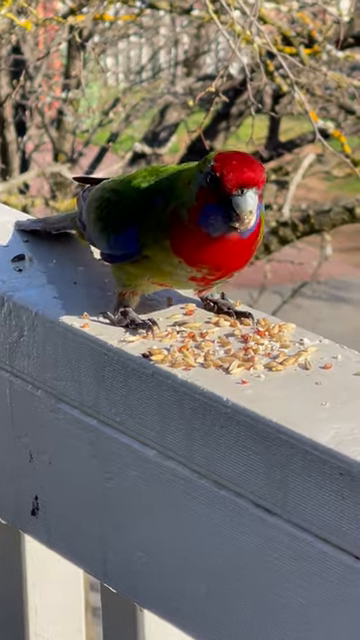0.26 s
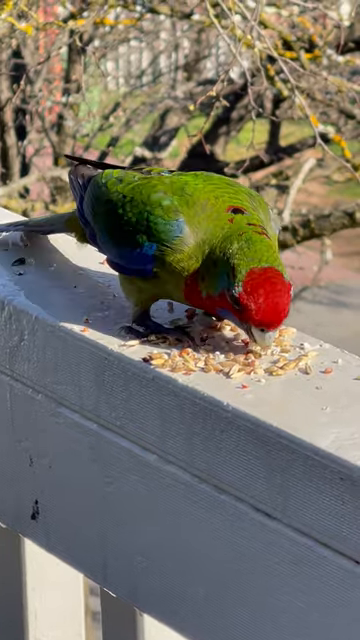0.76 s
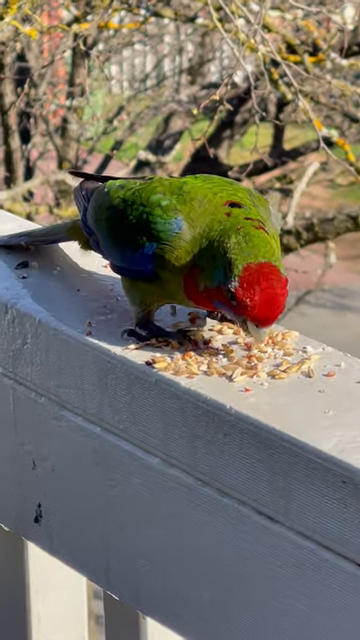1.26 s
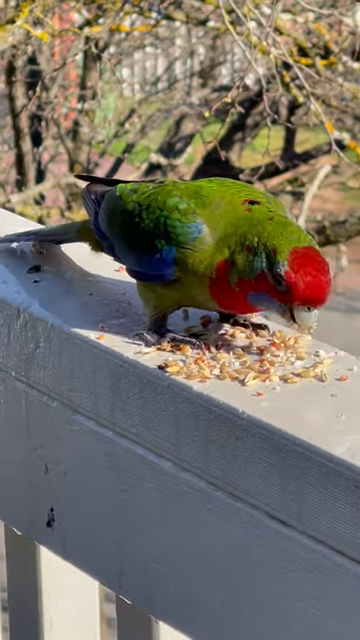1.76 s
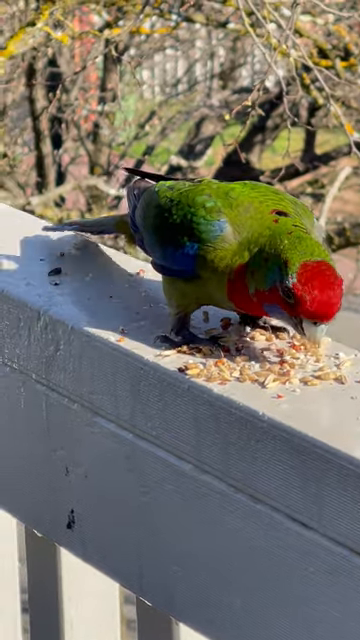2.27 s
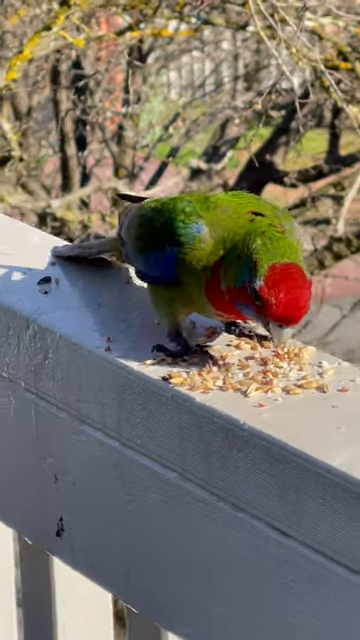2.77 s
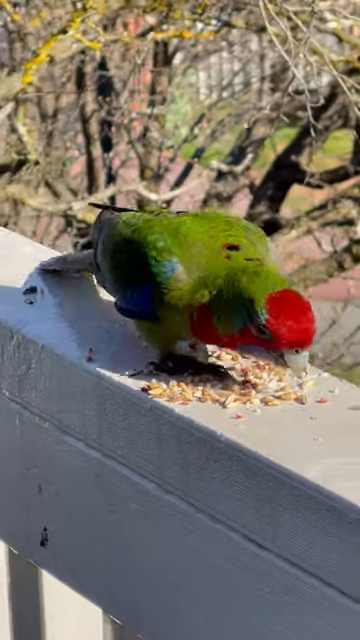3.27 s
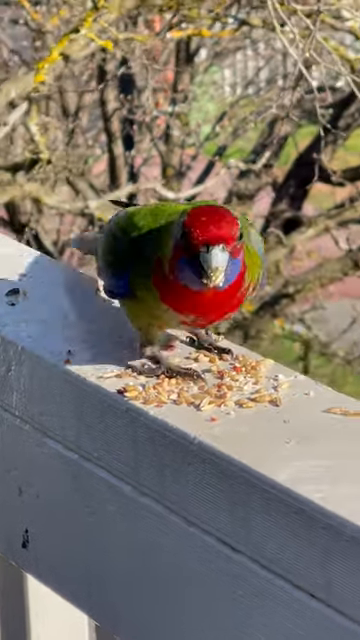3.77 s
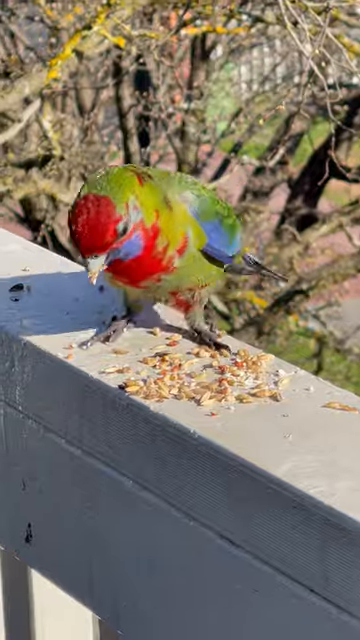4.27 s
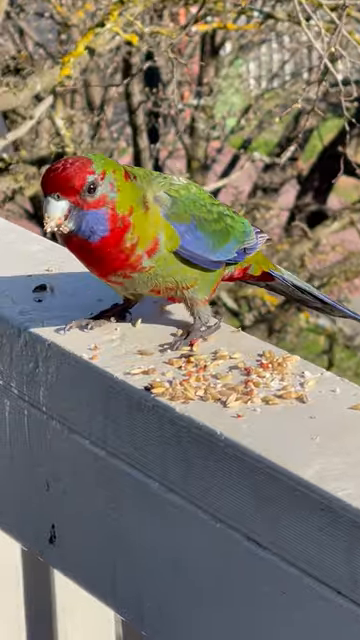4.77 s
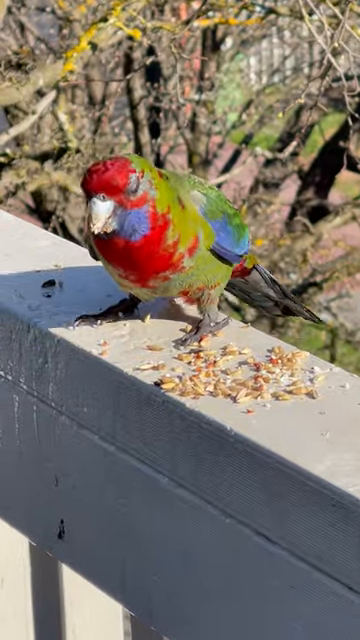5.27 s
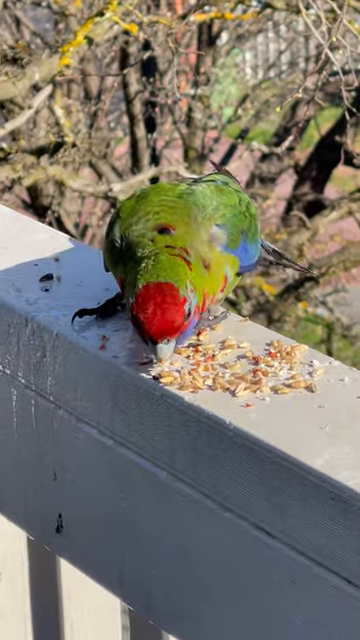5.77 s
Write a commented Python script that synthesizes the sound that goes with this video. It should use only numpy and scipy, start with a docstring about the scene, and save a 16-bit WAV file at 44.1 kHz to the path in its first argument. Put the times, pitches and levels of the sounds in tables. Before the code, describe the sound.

Outdoors on a porch, a parrot cracks seeds very near the microphone: two sharp snaps at once, the second very loud, then a pause with bird peeps over a low motor drone. Lighter knocks and husk crackles follow, claws squeak on the wooden rail, another loud crack comes near five seconds, then a short nasal squawk as a vehicle approaches.

```python
"""A husk crackles over a low far drone, outdoor air and a faint high buzz from a camera.
Then a parrot cracks seeds close by on a painted wooden porch rail: sharp snaps, pitched knocks, a short porch tail.
Garden birds call as gliding tones with a scattered tail; later claws stick, slip and squeak on the rail,
a nasal squawk is built from harmonics, and a vehicle draws nearer as tyre noise and gliding engine tones."""
import sys
import numpy as np
from scipy import signal
from scipy.fft import rfft, irfft
from scipy.io import wavfile
from scipy.ndimage import uniform_filter1d

SR = 44100
rng = np.random.default_rng(int(sys.argv[2]) if len(sys.argv) > 2 else 0)


def store_wav(level_fs):
    """Save 16-bit WAV to argv[1]."""
    pcm = np.round(np.clip(np.atleast_2d(level_fs), -1, 1) * 32767)
    wavfile.write(sys.argv[1], SR, pcm.T.astype(np.int16))


N = 266099
T = np.arange(N) / SR  # time/s
HZ = np.fft.rfftfreq(N, 1 / SR)  # f/Hz

# husks crumbling in the beak: [t/s, length/s, level/dB, brightness/(dB per octave)]
HUSK_CRUMBLES = [(0, 0.02, -63, 0), (0.056, 0.029, -57, -4), (0.431, 0.011, -68.5, 1),
                 (0.763, 0.03, -74.5, 0.5), (1.675, 0.014, -64, -1), (1.909, 0.027, -67, -3.5),
                 (2.24, 0.018, -69.5, -7.5), (2.799, 0.015, -58, -.5), (2.955, 0.044, -57, -6.5),
                 (3.669, 0.041, -67.5, 16), (3.709, 0.018, -62, 18), (5.237, 0.065, -74, -5),
                 (5.319, 0.024, -61.5, -2.5), (5.362, 0.094, -79, -2), (5.478, 0.018, -59, -7),
                 (5.606, 0.018, -65.5, -4), (5.66, 0.13, -77, -6), (5.798, 0.026, -67, 1),
                 (5.952, 0.021, -58.5, -3.5), (5.964, 0.072, -63.5, 2)]
# relative colour of crumbling husk: [f/Hz, level/dB]
HUSK_COLOUR = [(800, -24), (3000, -1.5), (4500, 1), (7000, 3.5), (9000, -0.5), (10900, 6), (11700, -18),
               (12600, -48), (15000, -75)]
# relative colour of the wooden rail under a claw: [f/Hz, level/dB]
RAIL_COLOUR = [(300, -20), (800, -11), (960, -3), (1100, -9), (1500, -13), (1780, -2), (2090, -1),
               (2240, -3), (2370, 2), (2560, -7), (2720, 0), (2900, -7), (3080, 1), (3300, -9), (3540, -4),
               (3900, -10), (4200, -7), (4800, -17), (8000, -27), (11000, -36), (13000, -60), (15000, -80)]

# swells of the far motor: [t/s, level/dB]
DRONE_LEVEL = [(0, -49), (.8, -48.5), (1.1, -46), (1.5, -51), (1.65, -56), (2.05, -59), (2.25, -54.5),
               (2.9, -53.5), (3.5, -67), (4.25, -69.5), (4.45, -51.5), (5.02, -47.5), (5.7, -58)]
# start pitch/Hz, its climb/(Hz per s), and the level/dB of the octave above
DRONE_HZ, DRONE_CLIMB_HZ_PER_S, DRONE_OCTAVE_DB = 82, .55, -65.5

# relative colour of the vehicle's tyre roar: [f/Hz, density/(dB per Hz)]
ROAD_COLOUR = [(25, -29.5), (55, 1), (120, 1), (250, 1.5), (500, -2), (900, -5), (1600, -12.5),
               (3000, -24.5), (5000, -34.5), (8000, -42), (11000, -51.5), (13000, -83), (15000, -92)]
# the vehicle's path, the loss over the ground between, and the roar at the closest point
CLOSEST_S, CLOSEST_M, SPEED_M_PER_S, LOSS_DB_PER_M, ROAR_DB = 5.95, 25, 15.94, 0.05, -50.5
# engine tones: [loudest t/s, f there/Hz, glide/(Hz per s), level/dB, rise/(dB per s), fall/(dB per s)]
ENGINE_TONES = [(3.8, 197.2, -7.5, -57, 9, 3.5), (4.501, 52.8, 4.5, -54, 27, 9.5),
                (5.68, 321, 26, -53, 10, 35)]
# relative colour of steady outdoor air: [f/Hz, density/(dB per Hz)]
AIR_COLOUR = [(15, -47.5), (28, -23.5), (45, -4), (75, 5.5), (120, -4.5), (190, -6), (260, -10),
              (360, -12.5), (700, -18), (1500, -25.5), (2600, -33), (4200, -51.5), (10800, -48.5),
              (13000, -70), (15000, -81.5)]

# shell cracks and beak taps: [t/s, snap energy/dB, snap brightness/(dB per octave),
# factor on the snap's frequencies, knock energy/dB, knock f/Hz]
SEED_CRACKS = [(0.1105, -14, -3, .98, -33, 2800), (.1613, 3, 0.5, 1, -20, 1204),
               (1.553, -60, -13, 1, -33, 1250), (1.888, -44, 2, 0.98, -52, 2590),
               (2.033, -54, -10, 1, -32.5, 1450), (2.276, -46, -6, 0.81, -56, 2960),
               (2.3727, -49.5, -15, 0.73, -43, 2010), (2.517, -27, -12.5, 1.05, -32, 2900),
               (2.6035, -42, 1, 0.93, -52, 3000), (2.801, -34, 0, 0.99, -55, 2400),
               (2.953, -29, -3, 0.92, -42, 1300), (3.541, -52, -6, 1, -30.5, 1550),
               (3.573, -33.5, 19, 0.99, -38, 2700), (4.108, -37, 24, 1, -50, 2400),
               (4.1244, -20, 23.5, .99, -34.5, 2400), (4.322, -39.5, -6, 1.03, -51.5, 2410),
               (4.402, -45, 8, 1.06, -52, 2410), (4.6417, -24, 4, 0.98, -28, 4100),
               (5.0719, -6, -6.5, 0.99, -24, 3400), (5.322, -32, 3, 1, -41, 2410),
               (5.336, -32.5, -10, .9, -41, 2000), (5.481, -40, -11, .9, -41, 3180),
               (5.7998, -32, 17, .98, -47, 2400), (5.901, -41, -4, 0.99, -58, 2400),
               (5.956, -29, -9, 0.99, -42, 1300)]
# relative colour of a snapping shell: [f/Hz, level/dB]
SNAP_COLOUR = [(500, -57.5), (2500, -29.5), (4500, -21), (5700, -16), (7200, -7), (9100, -1), (10800, -2.5),
               (11600, -19), (12600, -38), (14300, -43), (16000, -60)]
# broad resonance of beak and seed: [multiple of the knock's pitch, level/dB]
KNOCK_COLOUR = [(.15, -17), (.55, -12.5), (1, 0), (1.5, -9), (2.6, -17), (4, -35), (8, -52), (14, -68)]
# single echoes from nearby hard surfaces: [delay/s, level/dB]
HARD_ECHOES = [(.0026, -22), (.0053, -16.5), (.0071, -21.5), (0.0096, -25.5), (0.013, -25.5)]
# decay of the porch tail by 60 dB: [f/Hz, t60/s]
PORCH_DECAY = [(200, 0.27), (1500, 0.12), (4000, .24), (9000, 0.15), (11500, 0.19), (14000, 0.096)]

# a busy moment of faint chatter; its level is that of the lowest calls
CHATTER_START_S, CHATTER_END_S, CHATTER_LOW_HZ, CHATTER_HIGH_HZ, CHATTER_DB = .25, 1.25, 2100, 3400, -77.5
# a very distant bird repeats one rising note: [t/s, level/dB]
RISING_NOTES = [(5.222, -70.5), (5.348, -73), (5.6, -69), (5.72, -68)]
RISE_S, RISE_FROM_HZ, RISE_TO_HZ = .045, 2900, 4900
# single slurred chirps in the trees: [t/s, length/s, start f/Hz, end f/Hz, mid-note bow/Hz, level/dB]
SLURRED_CHIRPS = [(0.321, 0.031, 2190, 2665, 1, -68), (0.36, 0.01695, 2050, 2540, 3, -65.5),
                  (0.483, .052, 3330, 3100, 450, -83), (0.526, 0.062, 2940, 3070, -120, -75.5),
                  (0.585, 0.022, 3110, 2640, 72, -74), (0.807, 0.043, 2300, 2238, 0, -72),
                  (0.885, 0.05, 4590, 3840, 2, -86), (2.272, 0.06, 4130, 3490, -62, -70),
                  (2.308, 0.02, 2190, 2700, 4, -63.5), (2.389, .035, 2810, 2300, 2, -73.5),
                  (3.271, 0.075, 3390, 3340, -1, -78.5), (4.44, .035, 3350, 3140, 0, -73.5)]
# a far bird's runs of falling notes: [t/s, length/s, start f/Hz, level/dB]
FALLING_PEEPS = [(0.415, 0.04, 2005, -56.5), (0.537, 0.042, 1960, -59.5), (0.671, 0.043, 1953, -59),
                 (0.807, 0.044, 1940, -59.5), (.939, 0.049, 1900, -62), (1.072, 0.059, 1910, -64.5),
                 (1.202, 0.051, 2070, -64.5), (1.34, .061, 1990, -66), (2.376, 0.047, 1950, -63),
                 (2.498, 0.044, 1940, -63.5), (2.634, .053, 1920, -65.5)]
PEEP_FALL = .35  # share of the pitch lost over one note
# whistles with a falling end: [t/s, f/Hz, slope/(Hz per s), level/dB]
HOOKED_WHISTLES = [(0.913, 3015, -300, -66.5), (1.72, 3076, -1400, -66), (2.2, 2855, 1799, -64.5),
                   (2.654, 2920, 98, -66)]
# pitch bend shared by these whistles: [t into the note/s, factor on the pitch]
WHISTLE_BEND = [(0, 0.98), (.012, 1), (.064, 1), (.076, .95), (.092, .76)]
# the trill's start, length, centre pitch, and opening level at mid-sweep
TRILL_START_S, TRILL_LENGTH_S, TRILL_HZ, TRILL_DB = 2.437, .19, 3136, -62.5
# a thin high call that slides down and then holds: [t/s, f/Hz, level/dB]
THIN_CALL_PATH = [(2.665, 6300, -95), (2.688, 5880, -79), (2.76, 5790, -84.5), (2.88, 5810, -86),
                  (2.92, 5750, -100)]

# claws dragged over the rail: [t/s, length/s, wood level/dB, grit level/dB, squeak f/Hz, squeak level/dB]
CLAW_SCRAPES = [(2.971, 0.015, -59, -68, 2080, -58.5), (3.117, .016, -75, -74, 2130, -66),
                (3.129, 0.015, -61, -66, 2120, -53.5), (3.399, .022, -68, -77, 2120, -56.5),
                (3.42, 0.031, -57, -67, 2130, -49.5), (3.453, 0.027, -52, -64.5, 2050, -53),
                (3.572, 0.0212, -55.5, -72, 1980, -57.5), (3.603, 0.025, -74, -79, 1880, -59.5),
                (3.698, 0.04, -64, -75, 2070, -57.5)]
# a nasal squawk that breaks upward twice: [t/s, pitch f/Hz, level/dB]
SQUAWK_PATH = [(5.395, 739, -72), (5.434, 808, -64), (5.446, 771, -58.5), (5.453, 865, -53.5),
               (5.46, 880, -50.5), (5.47, 841, -54), (5.474, 774, -55), (5.5, 754, -54), (5.512, 735, -54),
               (5.527, 767, -59), (5.538, 750, -52), (5.549, 860, -50.5), (5.566, 841, -51),
               (5.585, 770, -70)]

# how alike the noise is at the two microphone ports: [f/Hz, likeness 0..1]
PORT_LIKENESS = [(150, 1), (250, .9), (600, .79), (1200, .58), (2000, 1)]
# phase by which the left port leads: [f/Hz, lead/rad]
PORT_LEAD = [(50, 0), (430, 0), (860, .55), (1460, -.3), (2500, .7), (4130, .75), (4650, 1.9), (5200, 4.9),
             (5650, 6.1), (8000, 8.3), (9150, 9.42), (10900, 11.1), (12000, 12.5)]
# left minus right: [f/Hz, level/dB]
PORT_BALANCE = [(40, -.3), (170, -1.4), (350, -2.4), (700, -3.3), (1400, -.4), (3000, .1), (11000, .7)]
EDGE_HZ = 16000  # upper band limit


def amp(db):
    """Turns decibels into gain."""
    return 10 ** (np.asarray(db) / 20)


def evened(x):
    """Scales a signal to rms 1."""
    return x / np.sqrt(np.mean(x ** 2) + 1e-20)


def read(points, hz):
    """Reads a spectrum on a log-frequency axis."""
    f, value = np.transpose(points)
    return np.interp(np.log(hz + 1e-9), np.log(f), value)


def follow(rows, t):
    """Reads every column of a curve at the times t."""
    s, *columns = np.transpose(rows)
    return [np.interp(t, s, c) for c in columns]


def add(mix, s, sound):
    """Mixes a sound in at time s."""
    part = mix[max(round(s * SR), 0):][:len(sound)]
    part += sound[:len(part)]


def drift(rate):
    """Smooth random motion of rms 1, changing about rate times a second."""
    noise = rfft(rng.standard_normal(N))
    return evened(irfft(noise * np.exp(-(HZ / rate) ** 2), N))


def colour(x, points, tilt_db=0, scale=1, size=1024):
    """Minimum-phase filter of energy 1; scale shifts its spectrum, tilt_db per octave acts from 2.5 to 11 kHz."""
    hz = abs(np.fft.fftfreq(size, 1 / SR))
    octaves = np.log2(np.clip(hz, 2500, 11000) / 11000)
    log_gain = np.log(amp(read(points, hz / scale) + tilt_db * octaves))
    # the Hilbert transform supplies the phase that makes the ring start at once
    ring = np.fft.ifft(np.exp(np.conj(signal.hilbert(log_gain)))).real
    return signal.fftconvolve(x, ring / np.linalg.norm(ring))


def note(hz, db, soft=0.17):
    """A pure whistle along a pitch curve; soft is the share of its length spent fading at the ends."""
    tone = np.sin(2 * np.pi * np.cumsum(hz) / SR)
    return amp(db) * np.sqrt(2) * tone * signal.windows.tukey(len(hz), soft)


def reflected(x):
    """Rail, post and wall send back single echoes within about 13 milliseconds."""
    out = x.copy()
    for delay, db in HARD_ECHOES:
        add(out, delay, amp(db) * x)
    return out


def porch(x, early_db, tail_db, first_s=0.0044, early_t60=0.026):
    """Close surfaces scatter the sound at once; walls and roof add a short tail whose decay varies with pitch."""
    t = T[:SR // 2]
    signs = rng.choice([-1., 1.], (2, len(t)))
    taps = signs * (rng.random((2, len(t))) < .2)
    early = taps[0] * (t > .001) * amp(-60 * t / early_t60)
    hz, frame_s, z = signal.stft(taps[1] * (t > first_s), SR, nperseg=256)
    decay = amp(-60 * frame_s / read(PORCH_DECAY, hz)[:, None])
    tail = signal.istft(z * decay, SR, nperseg=256)[1][:len(t)]
    echoes = amp(early_db) * early / np.linalg.norm(early)
    echoes += amp(tail_db) * tail / np.linalg.norm(tail)
    return x + signal.fftconvolve(x, echoes)[:N]


def garden(x, wet_db=-8, t60=0.45, taps_per_s=500):
    """Trees and fences scatter far calls into a thin, longer tail."""
    t = T[:SR // 2]
    taps = rng.standard_normal(len(t)) * (rng.random(len(t)) < taps_per_s / SR)
    tail = taps * (t > .008) * amp(-60 * t / t60)
    return x + amp(wet_db) * signal.fftconvolve(x, tail / np.linalg.norm(tail))[:N]


def slips(per_s, spread_db, clump_db):
    """Tiny stick-slip steps of uneven size that come in clumps."""
    spread = spread_db * np.minimum(rng.exponential(1, N), 4)
    size = amp(spread + clump_db * drift(140))
    return rng.choice([-1, 1], N) * (rng.random(N) < per_s / SR) * size


def stroke(steps, s, length, swell_db_per_s):
    """One stroke's run of slips, swelling or fading, with soft ends."""
    run = steps[max(int(s * SR), 0):][:int(length * SR)] + 1e-9
    swell = amp(swell_db_per_s * T[:len(run)])
    return evened(run * swell) * signal.windows.tukey(len(run), .3)


def husking(rail_db=-11):
    """Husks crackle in the beak as bursts of tiny slips and faintly ring the rail."""
    out = np.zeros(N)
    steps = slips(per_s=2500, spread_db=-0.5, clump_db=4.5)
    for s, length, db, bright_db in HUSK_CRUMBLES:
        run = amp(db) * stroke(steps, s, length, swell_db_per_s=-18.5)
        add(out, s, colour(run, HUSK_COLOUR, bright_db) + amp(rail_db) * colour(run, RAIL_COLOUR))
    return out


def engine_tone(hz, db, waver_hz, flutter_db):
    """A far engine order, wavering on the way through the air."""
    phase = 2 * np.pi * np.cumsum(hz + waver_hz * drift(8)) / SR
    return np.sqrt(2) * amp(db + flutter_db * drift(10)) * np.sin(phase)


def motor():
    """A low drone creeps up in speed and swells and sinks; its octave only flutters in level."""
    hz = DRONE_HZ + DRONE_CLIMB_HZ_PER_S * T
    db, = follow(DRONE_LEVEL, T)
    drone = engine_tone(hz, db, waver_hz=0.65, flutter_db=-0.06)
    return drone + engine_tone(2 * hz, DRONE_OCTAVE_DB, waver_hz=0.72, flutter_db=3.5)


def wash(spectrum, patchy_db):
    """Outdoor noise in drifting patches, partly shared between the two ports."""
    hz = np.fft.rfftfreq(2048, 1 / SR)
    a, b, c, d, patches = rng.standard_normal((N // 512 + 5, len(hz), 5)).T
    patches = uniform_filter1d(patches, size=14, axis=0)
    patches = evened(uniform_filter1d(patches, size=8, axis=1))
    same = read(PORT_LIKENESS, hz)[:, None]
    left = a + 1j * b
    right = same * left + np.sqrt(1 - same ** 2) * (c + 1j * d)
    z = np.array([left, right]) * amp(read(spectrum, hz)[:, None] + patchy_db * patches)
    return evened(signal.istft(z, nperseg=2048, noverlap=1536)[1][:, :N])


def vehicle():
    """Tyre roar grows as the distance shrinks; engine tones swell and fade as they glide."""
    metres = np.hypot(CLOSEST_M, SPEED_M_PER_S * (T - CLOSEST_S))
    nearness = CLOSEST_M / metres
    ground_db = -LOSS_DB_PER_M * (metres - CLOSEST_M)
    out = amp(ROAR_DB + ground_db) * nearness * wash(ROAD_COLOUR, patchy_db=1.22)
    for s, hz, glide, db, rise, fall in ENGINE_TONES:
        t = T - s
        swell_db = np.minimum(rise * t, -fall * t)
        out += engine_tone(hz + glide * t, db + swell_db, waver_hz=1.3, flutter_db=2.5)
    return out


def outdoor_air():
    """A steady bed of low, softly patchy air noise."""
    return amp(-52.5) * wash(AIR_COLOUR, patchy_db=1.37)


def camera_buzz(hz=10320, level_db=-71, hiss_db=-82, waver=1.04):
    """The camera's electronics give a tiny high pip with every frame, over a narrow hiss."""
    frame_rate, pip_s = 59.9, .0018
    since = (T * frame_rate % 1 - .5) / frame_rate
    pips = amp(level_db + 2 * drift(40)) * np.exp(-(since / pip_s) ** 2)
    phase = 2 * np.pi * hz * T
    hiss = drift(500) * np.sin(phase) + drift(460) * np.cos(phase)
    return pips * np.sin(phase + waver * drift(100)) + amp(hiss_db) * hiss


def cracks(split_s=0.00052, split_db=-11, rattle_db=-6, rattle_t60=0.03):
    """A shell snaps in one sharp step and splits on a moment later; each seed knocks at its own pitch."""
    out, t = np.zeros(N), T[:SR // 50]
    for s, snap_db, bright_db, shift, knock_db, knock_hz in SEED_CRACKS:
        snap = colour(amp([snap_db]), SNAP_COLOUR, bright_db, shift)
        add(out, s, snap)
        add(out, s + split_s * rng.uniform(.85, 1.3), amp(split_db) * snap)
        rattle = rng.standard_normal(len(t)) * amp(-60 * t / rattle_t60)
        # one click with a short rattle behind it excites the knock
        blow = (t == 0) + amp(rattle_db) * rattle / np.linalg.norm(rattle)
        add(out, s, amp(knock_db) * colour(blow, KNOCK_COLOUR, scale=knock_hz))
    return out


def far_birds(chatter_s=0.0253, glide=.25, dull_db_per_octave=12, blur_t60=.08, count=44):
    """Chatter and rising notes from so deep in the trees that only scattered sound arrives."""
    out = np.zeros(N)
    calls = [(s, RISE_S, RISE_FROM_HZ, RISE_TO_HZ, db) for s, db in RISING_NOTES]
    for when, height, slope in rng.random((count, 3)):
        s = CHATTER_START_S + when * (CHATTER_END_S - CHATTER_START_S)
        hz = CHATTER_LOW_HZ * (CHATTER_HIGH_HZ / CHATTER_LOW_HZ) ** height
        end_hz = hz * (1 + glide * (2 * slope - 1))
        db = CHATTER_DB - dull_db_per_octave * np.log2(hz / CHATTER_LOW_HZ)
        calls.append((s, chatter_s, hz, end_hz, db))
    for s, length, start_hz, end_hz, db in calls:
        paths = rng.standard_normal(4096) * amp(-60 * T[:4096] / blur_t60)
        call = note(np.linspace(start_hz, end_hz, int(length * SR)), db)
        add(out, s, signal.fftconvolve(call, paths / np.linalg.norm(paths)))
    return out


def twitters(wobble=0.0072, flutter_db=4.5):
    """Quick chirps in the trees glide and bow in pitch, unsteady in pitch and level."""
    out, unsteady = np.zeros(N), 1 + wobble * drift(200)
    for s, length, start_hz, end_hz, bow_hz, db in SLURRED_CHIRPS:
        t = T[T < length]
        bow = bow_hz * (1 - (2 * t / length - 1) ** 2)
        hz = np.interp(t, [0, length], [start_hz, end_hz]) + bow
        add(out, s, note(hz * np.interp(s + t, T, unsteady), db, soft=0.22))
    return out * amp(flutter_db * drift(130))


def peeps(echo_s=.037, echo_db=-4, flutter_db=1.5, wobble=.011, octave_db=-18):
    """Falling notes with a faint growing octave, each doubled by an echo off a wall."""
    out, unsteady = np.zeros(N), 1 + wobble * drift(270)
    for s, length, hz, db in FALLING_PEEPS:
        t = T[T < length]
        pitch = hz * (1 - PEEP_FALL) ** (t / length) * np.interp(s + t, T, unsteady)
        peep = note(pitch, db, soft=0.72) + note(2 * pitch, db + octave_db) * t / length
        add(out, s, peep)
        add(out, s + echo_s, amp(echo_db) * peep)
    return out * amp(flutter_db * drift(120))


def whistles(flutter_db=1.0, wobble=0.004):
    """Gently sloping whistles whose pitch drops in a hook at the end."""
    out, t = np.zeros(N), T[T < WHISTLE_BEND[-1][0]]
    bend, = follow(WHISTLE_BEND, t)
    unsteady = 1 + wobble * drift(150)
    for s, hz, slope, db in HOOKED_WHISTLES:
        pitch = (hz + slope * t) * bend * np.interp(s + t, T, unsteady)
        add(out, s, note(pitch, db, soft=0.1))
    return out * amp(flutter_db * drift(110))


def trill(sweeps_per_s=74, slowing_per_s=3.7, depth_hz=200, fade_db_per_s=18):
    """Short down-sweeps that slow and fade; the voice rests while the pitch jumps back."""
    out, t = np.zeros(N), T[T < TRILL_LENGTH_S]
    cycle = np.cumsum(sweeps_per_s * np.exp(-slowing_per_s * t)) / SR % 1
    pitch = TRILL_HZ + depth_hz * (1 - 2 * cycle)
    sweeps = note(pitch, TRILL_DB - fade_db_per_s * t, soft=0.18)
    add(out, TRILL_START_S, np.sin(np.pi * cycle) ** 2 * sweeps)
    return out


def thin_call(wobble=.011, flutter_db=3.5):
    """One faint, flickering high whistle follows a drawn pitch and level."""
    hz, db = follow(THIN_CALL_PATH, T)
    sounding = (T > THIN_CALL_PATH[0][0]) & (T < THIN_CALL_PATH[-1][0])
    pitch = hz * (1 + wobble * drift(210))
    return sounding * note(pitch, db + flutter_db * drift(60), soft=0)


def scrapes(squeak_width_hz=170):
    """A claw catches and slips: the wood rings, grit crackles, and each stroke squeaks at its own pitch."""
    out, t = np.zeros(N), T[:1024]
    steps = slips(per_s=1300, spread_db=2.6, clump_db=4.5)
    for s, length, wood_db, grit_db, hz, squeak_db in CLAW_SCRAPES:
        run = stroke(steps, s, length, swell_db_per_s=88)
        ring = np.sin(2 * np.pi * hz * t) * np.exp(-np.pi * squeak_width_hz * t)
        squeak = signal.fftconvolve(run, ring)
        squeak *= np.linalg.norm(run) / np.linalg.norm(squeak)
        wood = amp(wood_db) * colour(run, RAIL_COLOUR)
        grit = amp(grit_db) * colour(run, HUSK_COLOUR)
        add(out, s, wood + grit + amp(squeak_db) * squeak)
    return out


def squawk(throat_hz=2830, width_hz=620, low_hz=1680, low_width_hz=260, low_db=-16,
           jitter=.01, skirt_db=-28, rasp=.2):
    """Harmonics 2 to 6, with uneven cycles, slide through a strong throat resonance and a weaker, lower one."""
    hz, db = follow(SQUAWK_PATH, T)
    phase = 2 * np.pi * np.cumsum(hz * (1 + jitter * drift(260))) / SR

    def peak(f, centre, width):
        """One resonance of height 1."""
        return 1 / (1 + (2 * (f - centre) / width) ** 2)

    def throat(f):
        """Gain of both resonances over a low skirt."""
        return amp(skirt_db) + peak(f, throat_hz, width_hz) + amp(low_db) * peak(f, low_hz, low_width_hz)

    voice = sum(np.sin(k * phase) * throat(k * hz) for k in range(2, 7))
    voice = voice * (1 + rasp * drift(890))
    sounding = (T > SQUAWK_PATH[0][0]) & (T < SQUAWK_PATH[-1][0])
    soft_gate = uniform_filter1d(1. * sounding, size=400)
    return amp(db) * soft_gate * voice / np.std(voice[sounding])


def scene():
    """The parrot near by, birds further off, traffic behind."""
    parrot = porch(husking(), early_db=-35.0, tail_db=-3.0)
    parrot += porch(reflected(cracks()), early_db=-14.5, tail_db=-13.5)
    parrot += porch(scrapes(), early_db=-39, tail_db=-3.5)
    birds = garden(far_birds(), wet_db=0.0, t60=0.47, taps_per_s=1300)
    birds += garden(twitters(), wet_db=-3.5, t60=0.19, taps_per_s=2000)
    birds += garden(peeps(), wet_db=-8, t60=.4, taps_per_s=1500)
    birds += garden(whistles(), wet_db=-13)
    birds += garden(trill(), wet_db=-12)
    birds += garden(thin_call(), wet_db=-4)
    birds += garden(squawk(), wet_db=-15, t60=.25, taps_per_s=1600)
    return parrot + birds + motor() + vehicle() + outdoor_air() + camera_buzz()


def gain_lift(x, threshold_db=-24, lag_s=.003, recovery_db_per_s=25):
    """The gain rises slightly just after a very loud crack and settles back slowly."""
    lift_db_per_db = 1 / 1.7 - 0.5
    power = abs(uniform_filter1d((x ** 2).mean(0), size=88))
    level_db = 10 * np.log10(power + 1e-12)
    # each peak is held, sinking at the recovery rate
    fall = recovery_db_per_s * T
    held_db = np.maximum.accumulate(level_db + fall) - fall
    over_db = uniform_filter1d(np.maximum(held_db - threshold_db, 0), size=44)
    return x * amp(lift_db_per_db * np.interp(T - lag_s, T, over_db))


def record(dry, low_cut_hz=30):
    """Gain lift; the two ports differ in phase and level; then the bass cut and the band limit."""
    # each port takes half of the difference
    port = np.exp(.5j * read(PORT_LEAD, HZ)) * amp(read(PORT_BALANCE, HZ) / 2)
    bass_cut = 1 - 1 / (1 + (HZ / low_cut_hz) ** 4)
    heard = irfft(rfft(gain_lift(dry)) * bass_cut * np.array([port, 1 / port]), N)
    band_limit = signal.firwin(255, EDGE_HZ, window=("kaiser", 9), fs=SR)
    return signal.oaconvolve(heard, band_limit[None], "same")


dry = scene()
out = record(dry)
store_wav(out)
```